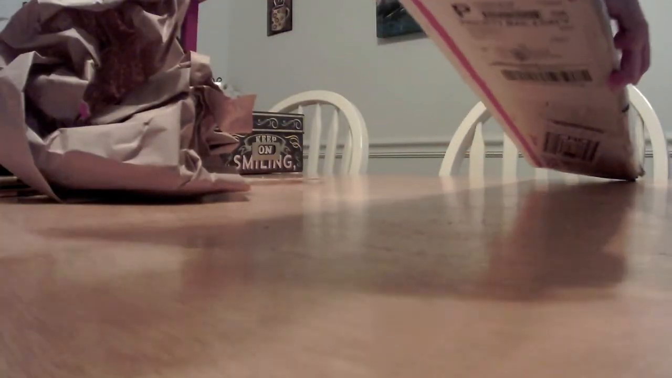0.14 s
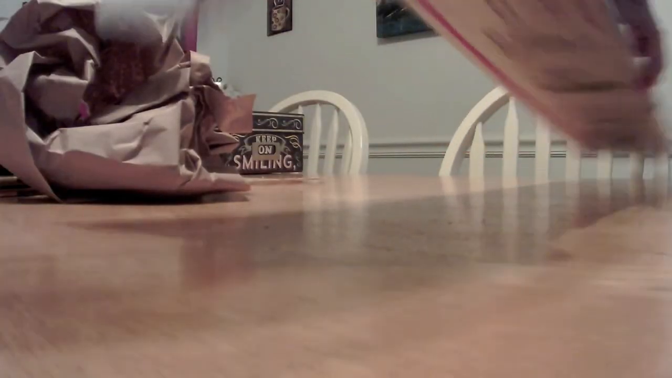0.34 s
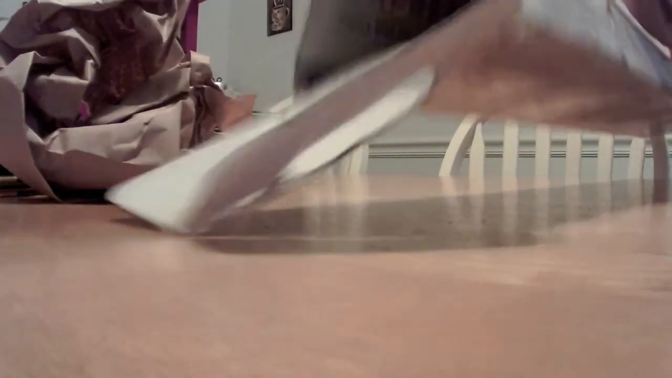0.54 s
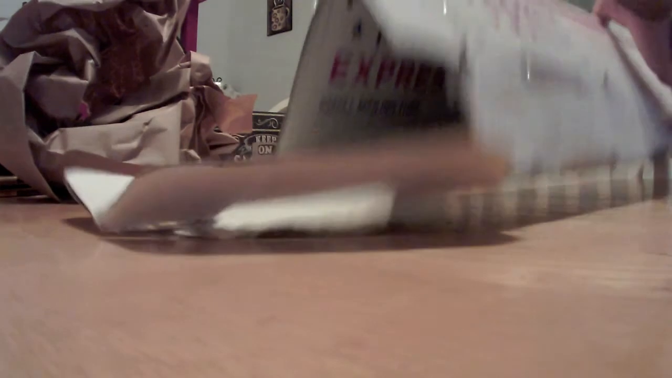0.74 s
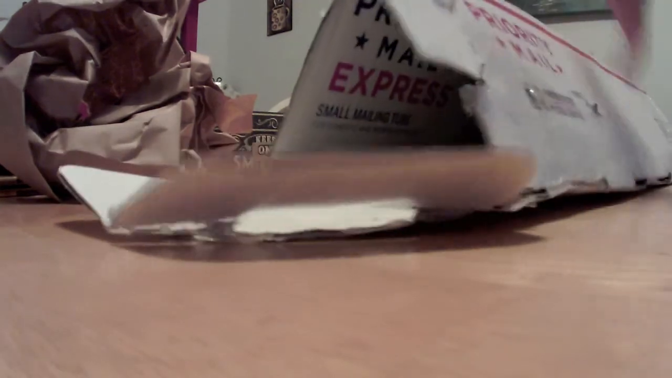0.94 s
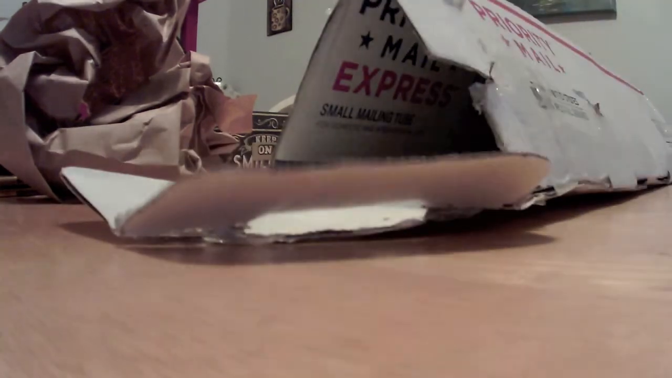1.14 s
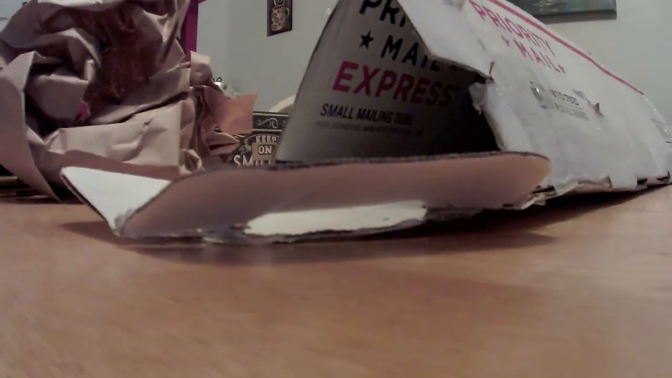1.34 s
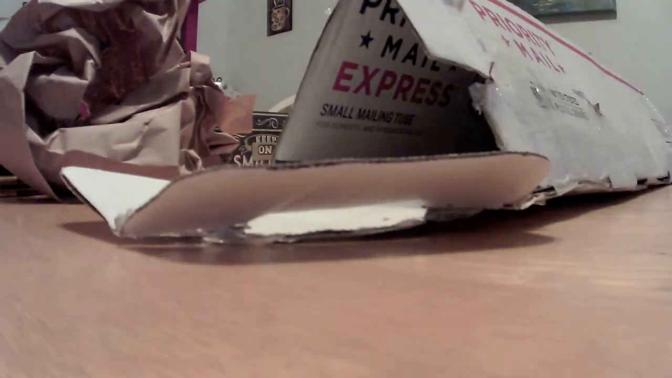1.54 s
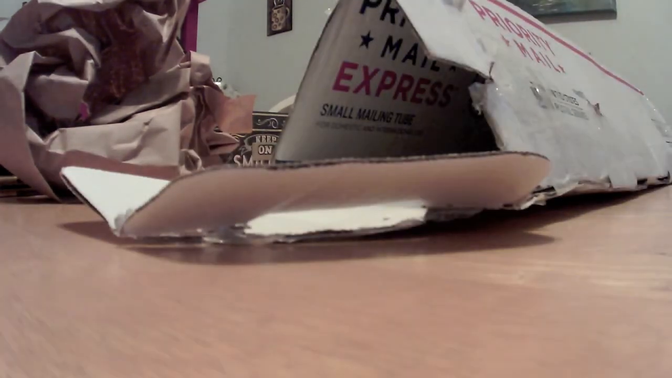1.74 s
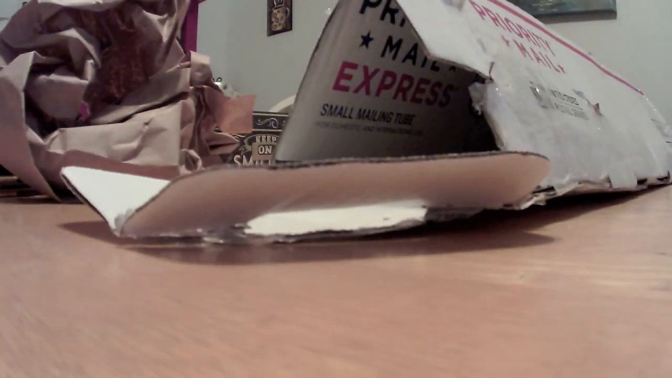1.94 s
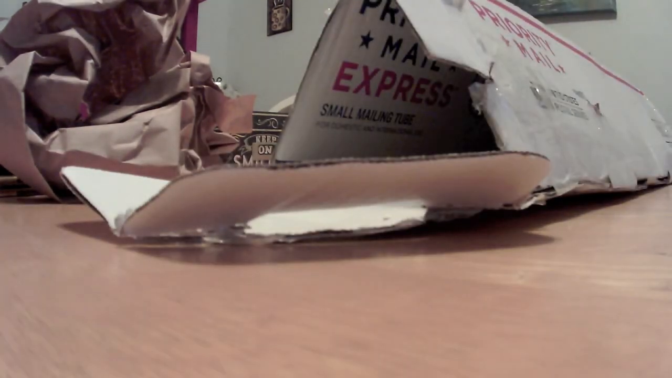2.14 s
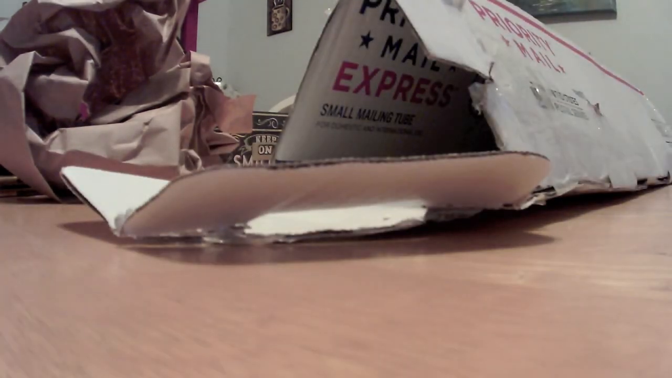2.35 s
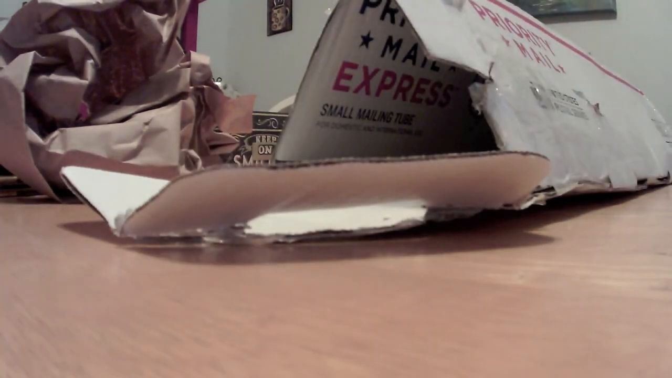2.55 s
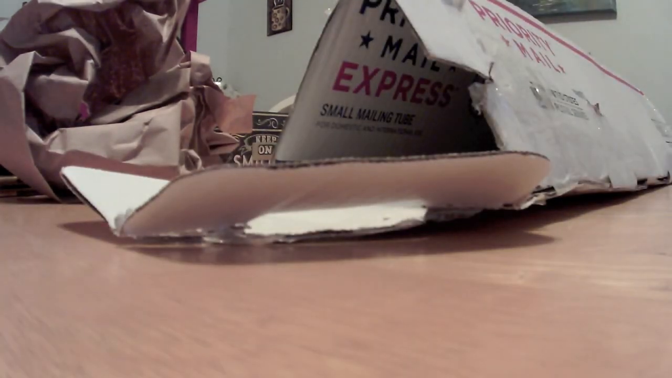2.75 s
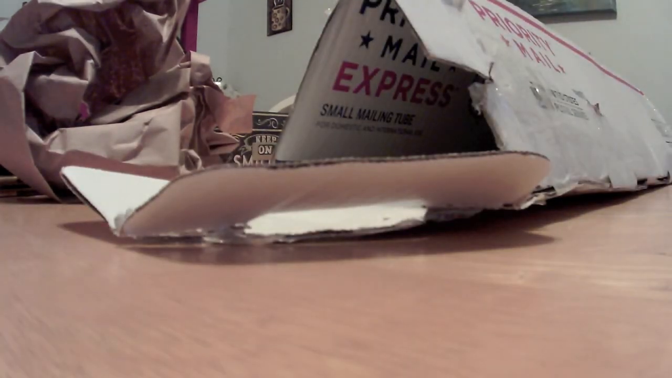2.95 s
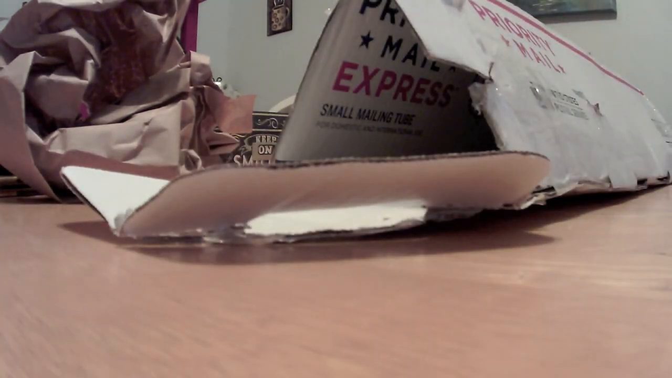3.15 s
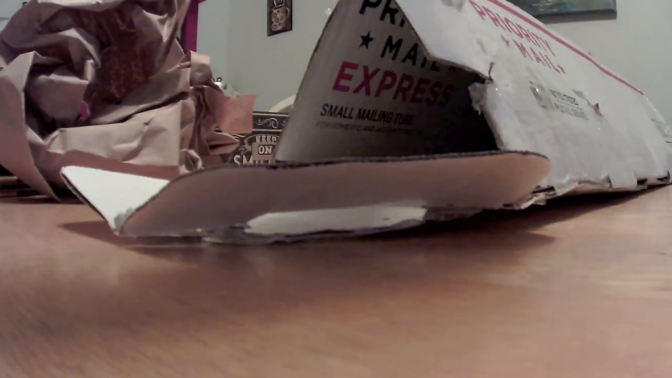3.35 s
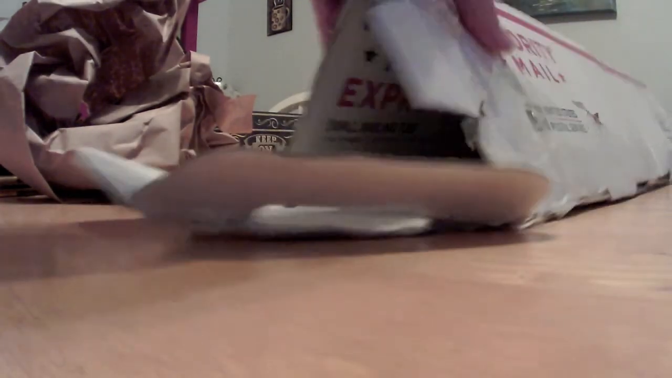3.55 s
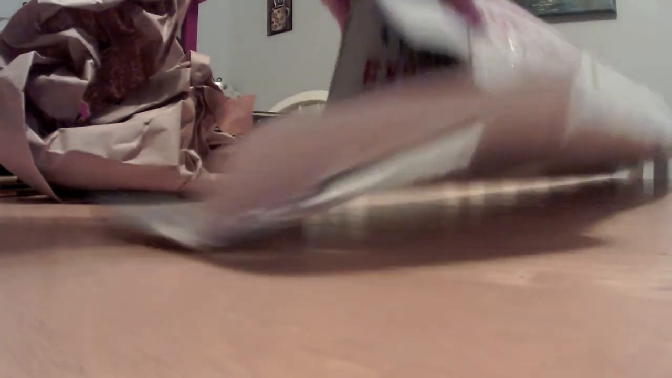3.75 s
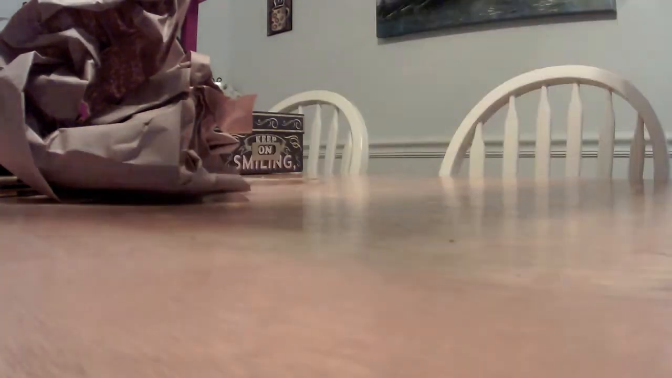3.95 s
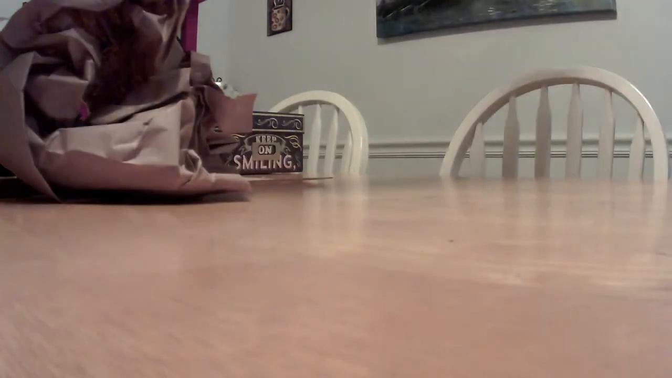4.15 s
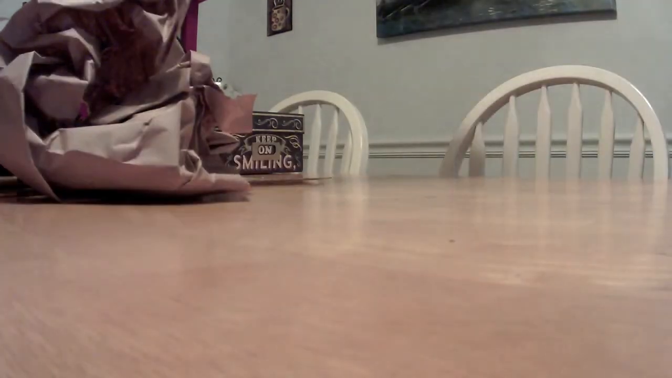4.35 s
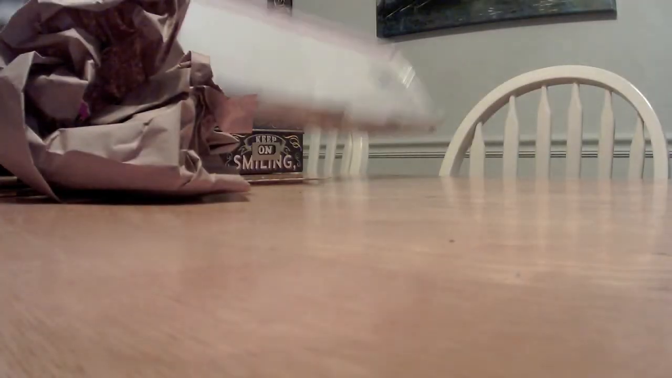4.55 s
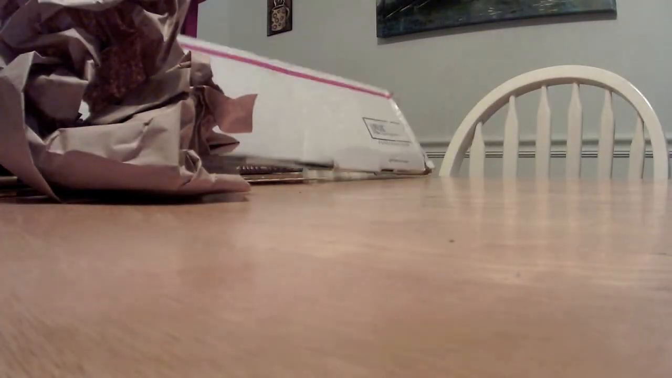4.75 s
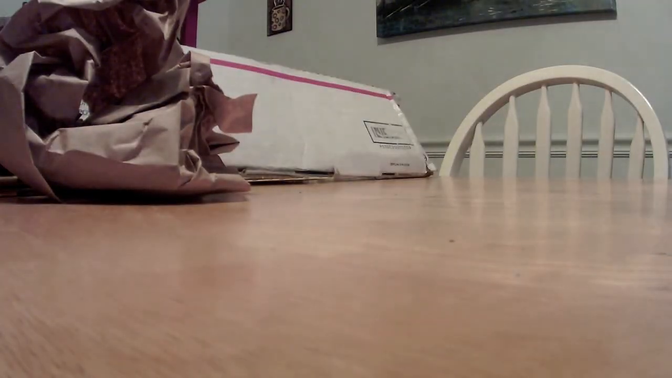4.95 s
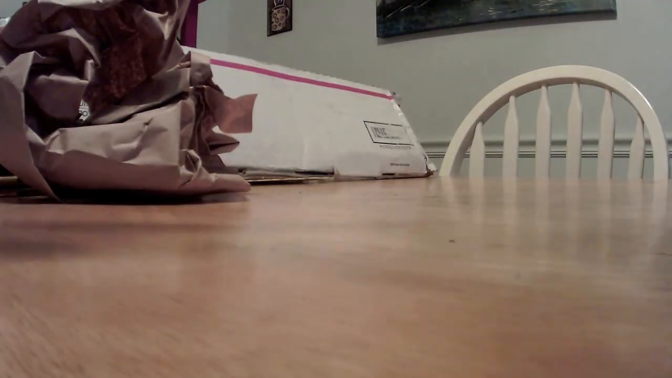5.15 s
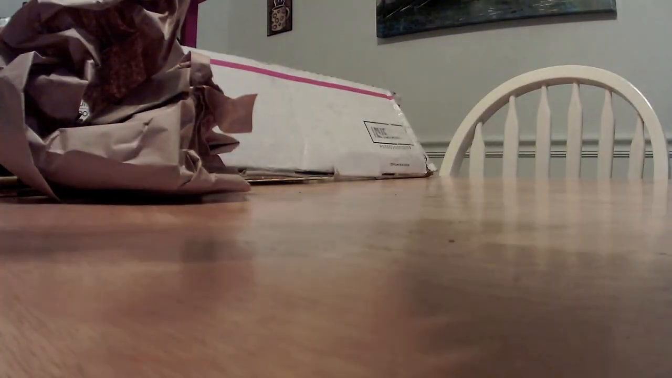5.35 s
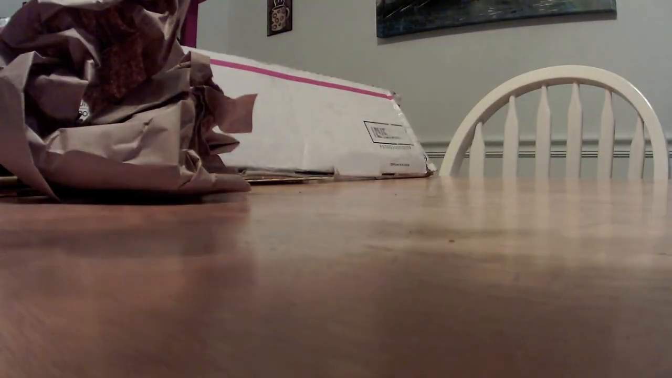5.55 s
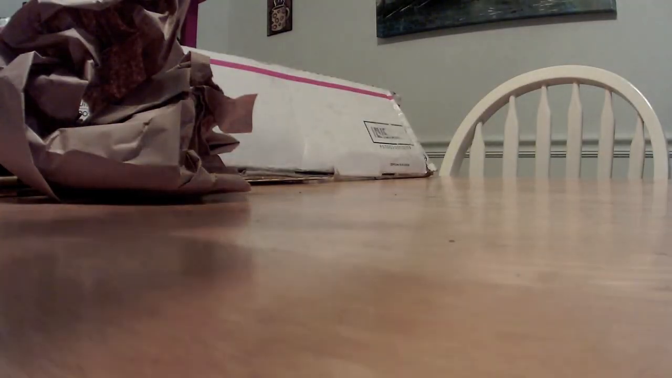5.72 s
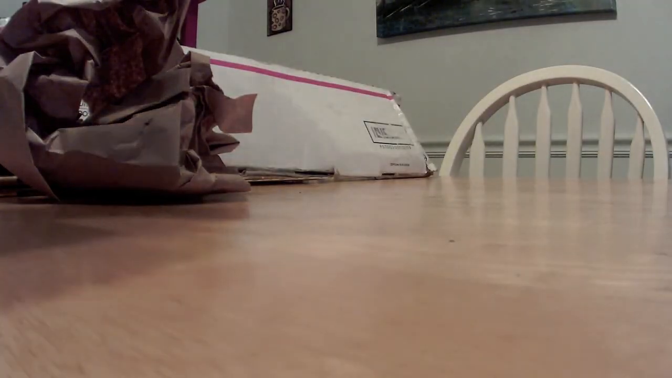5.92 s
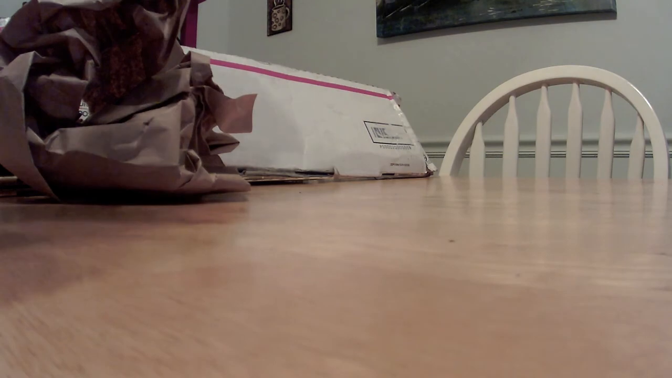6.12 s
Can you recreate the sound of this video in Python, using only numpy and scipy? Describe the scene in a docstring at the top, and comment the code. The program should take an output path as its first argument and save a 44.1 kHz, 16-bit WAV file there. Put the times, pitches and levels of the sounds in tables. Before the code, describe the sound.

A long cardboard box scrapes with a dry, fizzy hiss and lands on a wooden table with a hollow knock and a low thud. Packing paper then rustles and crackles. The box is lifted with more scrapes and bumps and set down again, and a last burst of crinkling follows. The room is small, and the microphone stands on the table, so each bump comes through as a low boom.

```python
"""A long cardboard mailing box is scraped, laid on a wooden table, lifted and set down further off.
Sliding, it fizzes with tiny slips; its edges flick, and knocks on its wall ring the hollow inside.
Between the moves, packing paper rustles as it buckles, and its creases snap. The room is small.
The microphone stands on the table, so every bump reaches it as a low boom."""
import sys
import numpy as np
from scipy import signal
from scipy.fft import rfft, irfft
from scipy.io import wavfile
from scipy.ndimage import uniform_filter1d

SR = 44100
rng = np.random.default_rng(int(sys.argv[2]) if len(sys.argv) > 2 else 0)


def wav_out(sig):
    """Save sig, one row per channel (or a flat mono array), as 16-bit PCM at SR to the path in sys.argv[1]."""
    wavfile.write(sys.argv[1], SR, np.round(np.clip(np.atleast_2d(sig).T, -1, 1) * 32767).astype(np.int16))


N = 276948
T = np.arange(N) / SR
BIN_HZ = np.fft.rfftfreq(N, 1 / SR)

# spectrum of cracking cardboard: (frequency [Hz], level [dB])
CARD_CRACK_SPECTRUM = [(100, -11), (500, -16.5), (1000, -2.5), (1600, 6), (4000, -4.5), (7000, 2.5),
                       (9500, 1.5)]
# paper squeezes: (start [s], swell [s], hold [s], fade [s per 20 dB], level [dB], treble offset [dB])
SQUEEZES = [(1.43, 0.08694, 0.08056, 0.0008, -45, 0), (1.58, 0.24759, .025, 0.166, -40.5, 3),
            (1.955, 0.03349, 0.01683, 0.0972, -45, -1), (2.1, 0.02444, 0.30913, 0.1082, -62.5, -5),
            (2.452, 0.028325, 0.02673, 0.0579, -38, -3.5), (2.54, 0.02431, 0.014385, 0.1109, -37, 0.5),
            (2.68, 0.02619, 0.0071, 0.0779, -42, -1), (2.875, 0.00856, 0.01616, 0.1124, -58, -7),
            (3.025, 0.006638, 0.0543, 0.2207, -60.5, -5.5), (5.395, 0.03952, 0.0564, 0.1652, -42, -0.5),
            (5.53, 0.07427, 0.10013, 0.0594, -36.5, 2), (5.835, 0.01639, 0.0625, 0.0479, -53.5, -3)]


def amp(db):
    """Decibels to gain."""
    return 10 ** (np.asarray(db) / 20)


def unit_rms(x):
    """Scales to rms 1."""
    return x / np.sqrt(np.mean(x ** 2) + 1e-20)


def log_interp(points, hz):
    """Reads a table on a log-frequency axis."""
    point_hz, value = np.transpose(points)
    return np.interp(np.log(hz + 1), np.log(point_hz + 1), value)


def add(mix, start_s, sound):
    """Mixes a sound in at start_s."""
    part = mix[max(round(start_s * SR), 0):][:len(sound)]
    part += sound[:len(part)]


def coloured(x, spectrum, centre_hz=1000, skirt_db_oct=0):
    """Minimum-phase filter: a spectrum times skirts that fall away from a centre."""
    hz = np.fft.rfftfreq(2048, 1 / SR)
    db = log_interp(spectrum, hz) - skirt_db_oct * np.hypot(np.log2((hz + 20) / centre_hz), 1 / 4)
    log_gain = np.log(amp(np.r_[db, db[-2:0:-1]]))
    taps = np.fft.ifft(np.exp(np.conj(signal.hilbert(log_gain)))).real
    return signal.oaconvolve(x, taps)[:len(x)]


def split(x, hz):
    """The bands below and above hz, each at rms 1."""
    low = irfft(rfft(x) / (1 + (BIN_HZ / hz) ** 6), N)
    return unit_rms(low), unit_rms(x - low)


def strokes(rows):
    """Swell, hold and fade of each stroke: gains of the main band and the offset band."""
    main, offset = np.zeros((2, N))
    for start_s, swell_s, hold_s, fade_s, db, offset_db in rows:
        rise = np.clip((T - start_s) / swell_s, 0, 1) ** 0.982
        gain = rise * amp(db - 20 * np.maximum(T - start_s - swell_s - hold_s, 0) / fade_s)
        main, offset = np.hypot(main, gain), np.hypot(offset, gain * amp(offset_db))
    return main, offset


def grains(per_s, spread_db, cycles, hiss, clump_db, facets=24):
    """Tiny slips of uneven size, each briefly ringing one facet, over the hiss of rubbing fibres."""
    t, out = np.arange(256) / SR, np.zeros(N)
    clumps = amp(clump_db * unit_rms(uniform_filter1d(rng.standard_normal(N), size=220)))
    for hz in np.linspace(900, 9600, facets):
        sizes = amp(spread_db * np.minimum(rng.exponential(1, N), 4)) * rng.choice([-1, 1], N)
        slips = sizes * (rng.random(N) < per_s / facets / SR)
        facet = np.exp(-t * np.sqrt(hz * 4000) / cycles) * np.sin(2 * np.pi * hz * t)
        out += np.convolve(slips, unit_rms(facet))[:N]
    out = clumps * (unit_rms(out) + hiss * rng.standard_normal(N))
    return out / np.sqrt(uniform_filter1d(out ** 2, size=2200) + 1e-9)  # levelled over 50 ms


def flexed(x, depth_db):
    """A bending sheet changes shape, so its broad resonances come and go."""
    spectra = signal.stft(x, nperseg=256)[2]
    patches = uniform_filter1d(rng.standard_normal(spectra.shape), size=4, axis=0)
    patches = uniform_filter1d(patches, size=20, axis=1)
    return signal.istft(spectra * amp(depth_db * unit_rms(patches)), nperseg=256)[1][:N]


def burst(t60_s, rise_s=0.0014, size=4096):
    """A shower of fibre breaks that swells in an instant and dies fast."""
    t = np.arange(size) / SR
    return rng.choice([-1, 1], size) * (1 - np.exp(-t / rise_s)) * amp(-60 * t / max(t60_s, .001))


def at_level(sound, db):
    """Gives a short sound the energy of 4 ms at this level."""
    return amp(db) * sound / np.linalg.norm(sound) * np.sqrt(SR / 250)


def cracks(rows, spectrum):
    """A crease or edge lets go: one burst, coloured by the size of the facet that moves."""
    out = np.zeros(N)
    for start_s, db, centre_hz, t60_s in rows:
        crack = coloured(burst(t60_s), spectrum, centre_hz, skirt_db_oct=7)
        add(out, start_s, at_level(crack, db))
    return out


def scraping():
    """Cardboard slides: a fizz at the edge, the hollow body below it, a rumble through the table."""
    # box slides: (start [s], swell [s], hold [s], fade [s per 20 dB], level [dB], body offset [dB])
    slides = [(-.03, 0.08848, 0.01925, 0.0991, -34.5, -5), (.09, 0.03481, 0.1113, 0.1739, -36.5, -9.5),
              (.29, 0.0459, 0.19533, 0.0499, -36.5, -8.5), (.4, 0.055435, 0.038973, 0.0385, -26, -9.5),
              (.55, 0.01311, 0.00448, 0.0283, -41.5, 1.5), (.58, .01, 0.0729, 0.5994, -56, -4),
              (.67, 0.00704, 0.0062, 0.0721, -47, -8), (.775, 0.05013, 0.07565, 0.1958, -51, 1),
              (.902, 0.014993, 0.04907, 0.0527, -40.5, 0), (.942, 0.00559, 0.010544, 0.0054, -30, -0.5),
              (1.025, 0.01413, 0.004695, 0.2218, -50.5, -1), (3.645, 0.03072, 0.004, 0.1048, -42, 2),
              (3.705, 0.02173, 0.00352, 0.0807, -35.5, -5), (3.75, 0.0277, 0.1491, 0.1435, -50.5, -1.5),
              (3.853, 0.0062, 0.004854, 0.0749, -43.5, 4), (3.928, 0.007195, 0.005036, 0.0519, -45, 5.5),
              (4.737, 0.014034, 0.01072, 0.0682, -43, 0), (4.812, 0.04264, 0.01388, 0.1031, -42.5, -0.5),
              (4.91, 0.01218, 0.0628, 0.1811, -50.5, -.5)]
    # spectrum of rubbed cardboard: (frequency [Hz], level [dB])
    card_spectrum = [(150, -48.5), (250, -16.5), (545, -15), (973, -5), (1190, -5.5), (1420, 0), (3100, -3),
                     (3450, -5), (6660, -1), (7290, -4.5), (7870, -11.5), (8500, 2), (9600, -1),
                     (12500, -44), (21100, -120)]
    slips = grains(per_s=3200, spread_db=3.7, cycles=1.2, hiss=.7, clump_db=1.5)
    body, fizz = split(coloured(flexed(slips, depth_db=2), card_spectrum), hz=2131.5)
    rumble = split(rng.standard_normal(N), hz=220.2)[0]
    fizz_gain, body_gain = strokes(slides)
    return amp(-0.8012) * (fizz * fizz_gain + body * body_gain) + amp(-17.5) * rumble * body_gain


def room_noise(noise_db=-56.5, flutter_db=1.4651, hum_hz=61.8, hum_db=-67):
    """Slightly fluttering background noise with a faint, wavering hum."""
    # background spectrum: (frequency [Hz], level [dB])
    air_spectrum = [(20, -5), (45, 1.5), (70, -1), (100, -7), (200, -10.5), (400, -14.5), (800, -18.5),
                    (1600, -18.5), (4000, -22.5), (9500, -23.5)]
    noise, flutter, waver = (unit_rms(irfft(rfft(rng.standard_normal(N)) * gain, N)) for gain in
                             (amp(log_interp(air_spectrum, BIN_HZ)), *[np.exp(-BIN_HZ / 5)] * 2))
    hum = np.sin(2 * np.pi * hum_hz * T + .5 * waver) * amp(3.4 * flutter)
    return noise * amp(noise_db + flutter_db * flutter) + amp(hum_db) * unit_rms(hum)


def flicking():
    """Edges and flaps of the box catch and let go."""
    # edge flicks: (time [s], level [dB], centre [Hz], t60 [s])
    flicks = [(.2341, -15.5, 6900, 0.007168), (.3169, -30, 3900, 0.01149), (.4414, -28.5, 6200, 0.0065),
              (.4497, -21.5, 7050, 0.01226), (.4687, -22.5, 4000, 0.00788), (.5678, -25, 6873, 0.01483),
              (.5817, -32, 7500, 0.01018), (.6762, -28, 5533, 0.01517), (.8183, -35, 7300, 0.01267),
              (.9183, -31, 5280, 0.01637), (1.0067, -33.5, 4810, 0.00916), (3.5492, -42.5, 3375, 0.007093),
              (3.6553, -36, 2293, 0.00867), (3.6675, -31, 6000, 0.00626), (3.6718, -29.5, 2708, 0.00932),
              (3.8501, -19.5, 6523, 0.002681), (4.1226, -45, 4126, 0.00772), (4.5285, -49.5, 5570, .007),
              (4.5856, -48, 2558, 0.03536), (4.7407, -42.5, 3570, 0.00505), (4.8515, -31, 6140, 0.006885),
              (4.8948, -26.5, 7950, 0.018), (4.9183, -32.5, 4200, 0.01392), (4.9447, -37, 3170, 0.0059),
              (4.9849, -35.5, 5724, 0.02434)]
    return cracks(flicks, CARD_CRACK_SPECTRUM)


def hollow_ring(t):
    """The inside of the box rings roughly: each resonance is a cluster of beating modes."""
    # box resonances: (frequency [Hz], level [dB], t60 [s])
    resonances = [(1000, -7.5, 0.14), (1133.8, -8, 0.33), (1389.2, -7, 0.44), (1501.5, 4, 1),
                  (1472.3, -10, 0.35), (1637.6, -6.5, 1), (1854.4, -3, 0.94), (1781, 1.5, 0.18),
                  (2392, -21, .3), (2988.5, 8.5, 0.3711)]
    beats = uniform_filter1d(rng.standard_normal((len(resonances), len(t))), size=500, axis=1)
    hz, db, t60_s = np.transpose(resonances)[:, :, None]
    return (beats * amp(db - 60 * t / t60_s) * np.sin(2 * np.pi * hz * t)).sum(0)


def knocking(crunch_db=-7.5, rise_s=0.0003178, picked_up_s=3.6):
    """The box wall yields with a damped note and a crunch; the inside rings, less once picked up."""
    # wall knocks: (time [s], level [dB], pitch [Hz], t60 [s])
    knocks = [(.235, -33.5, 817.3, 0.00715), (.9465, -27.5, 1587, .018), (0.9549, -23, 1504, 0.009046),
              (1.018, -40, 1680, 0.0189), (1.108, -45.5, 1708, 0.01056), (1.154, -46, 1636, 0.009),
              (3.063, -48.5, 1361, 0.0426), (3.6719, -33, 1496, 0.00869), (3.727, -36, 1619, 0.01357),
              (3.858, -33.5, 1073, 0.01177), (3.931, -23, 1626, 0.01188), (4.585, -50, 1450, 0.03078),
              (4.747, -38.5, 1874, 0.01238), (4.763, -38, 1821, 0.01348), (4.852, -28.5, 1261, 0.02345),
              (4.866, -43, 516.7, 0.048), (4.919, -37, 1300, 0.014), (5.092, -51, 1603, 0.0085)]
    out, t = np.zeros(N), np.arange(SR // 2) / SR
    contact = 1 - np.exp(-t / rise_s)
    for start_s, db, hz, t60_s in knocks:
        ring_db = -10.5 if start_s < picked_up_s else -26.5
        wall = contact * amp(-60 * t / t60_s) * np.sin(2 * np.pi * hz * t)
        crunch = coloured(burst(2 * t60_s), CARD_CRACK_SPECTRUM, hz, skirt_db_oct=9)
        add(out, start_s, at_level(wall, db))
        add(out, start_s, at_level(crunch, db + crunch_db))
        add(out, start_s, at_level(contact * hollow_ring(t), db + ring_db))
    return out


def bumping(skirt_db_oct=7, cut_db_oct=12, rise_s=0.004096, settle_s=0.010967, settle_hz=47.685):
    """The table top booms: each blow drives its modes, then the weight follows as a soft, low push."""
    # bumps on the table: (time [s], blow [dB], drive centre [Hz], settling weight [dB])
    bumps = [(.55, -46, 149, -37.5), (.916, -36, 230, -51.5), (.952, -26, 399.1, -34),
             (1.028, -45, 200.1, -34.5), (1.136, -46, 190.3, -41), (2.619, -27.5, 175.5, -34.5),
             (3.675, -34.5, 240.2, -39.5), (3.858, -19.5, 321.6, -38.5), (3.906, -46.5, 190, -39.5),
             (4.747, -29.5, 187.3, -44.5), (4.801, -41, 190, -39), (4.861, -32.5, 189, -42),
             (4.943, -36.5, 188.7, -31.5), (5.02, -45, 190, -38)]
    # table-top modes: (frequency [Hz], level [dB], t60 [s])
    table_modes = [(42.564, -5.5, 0.6), (60.818, 6, 0.5583), (122.78, -6.5, 0.338), (189.71, 4.5, 0.1181),
                   (220.42, -6, 0.1733), (304.19, -1, 0.06741), (406.87, -14.5, 0.1545),
                   (503.06, -23, 0.14)]
    out, t = np.zeros(N), np.arange(SR) / SR
    hz, mode_db, t60_s = np.transpose(table_modes)[:, :, None]
    modes = amp(-60 * t / t60_s) * np.sin(2 * np.pi * hz * t) * (1 - np.exp(-t / rise_s))
    blows = [(s, db, drive_hz) for s, db, drive_hz, _ in bumps]
    settles = [(s + settle_s, weight_db, settle_hz) for s, _, _, weight_db in bumps]
    for start_s, db, drive_hz in blows + settles:
        octaves = np.log2(hz / drive_hz)
        # modes quicker than the contact are hardly driven
        drive = amp(mode_db - skirt_db_oct * abs(octaves) - cut_db_oct * np.maximum(octaves, 0))
        add(out, start_s, amp(db) * (drive * modes).sum(0) / np.linalg.norm(drive))
    return out


def crinkles(tries, firm_db=-42, slack_db=-62):
    """Small creases give way at random, louder under a harder squeeze; returns snap rows."""
    time_s = rng.random(tries) * T[-1]
    size, facet = np.clip(rng.standard_normal((tries, 2)), -2, 2).T
    squeeze_db = 20 * np.log10(np.interp(time_s, T, strokes(SQUEEZES)[0]) + 1e-9)
    level_db = -40 + 0.4632 * (squeeze_db - firm_db) + 2 * size
    centre_hz = 5394 * 2 ** (0.36 * facet)
    return list(np.c_[time_s, level_db, centre_hz][squeeze_db > slack_db])


def snapping(t60_s=0.004591):
    """Paper creases snap, large and small, all dying equally fast."""
    # large creases: (time [s], level [dB], centre [Hz])
    snaps = [(1.3595, -47, 2950), (1.4695, -42.5, 3780), (1.4939, -35, 4400), (1.5048, -31, 3670),
             (1.543, -30.5, 6250), (1.568, -26.5, 6940), (1.5899, -31, 6740), (1.641, -38.5, 6440),
             (1.6873, -35.5, 7600), (1.8364, -33.5, 5570), (1.9542, -36, 5900), (2.1382, -38, 6300),
             (2.1807, -33, 6960), (2.2205, -38, 6160), (2.2454, -40, 3150), (2.3663, -44, 2970),
             (2.403, -41.5, 3450), (2.4619, -40, 3440), (2.547, -38.5, 7440), (2.5628, -28.5, 5430),
             (2.5691, -32.5, 4300), (2.691, -29.5, 7200), (2.79, -45, 3070), (2.8812, -40, 4600),
             (3.061, -39.5, 5200), (5.306, -49, 3227), (5.4747, -28, 4250), (5.551, -27.5, 3880),
             (5.602, -23, 7200), (5.7669, -32.5, 8000), (5.7921, -30, 4309), (5.8388, -40.5, 6200),
             (6.1955, -32, 6308)]
    # spectrum of a snapping crease: (frequency [Hz], level [dB])
    crease_spectrum = [(100, -40), (600, -7.5), (1400, -1.5), (2800, 4), (4500, -2), (7000, -0.5),
                       (9500, 0.5)]
    rows = [(s, db, hz, t60_s) for s, db, hz in snaps + crinkles(tries=160)]
    return cracks(rows, crease_spectrum)


def rustling():
    """Paper crumples in clumps of small buckles."""
    # spectrum of crumpling paper: (frequency [Hz], level [dB])
    paper_spectrum = [(210, -67), (350, -25.5), (380, -25), (530, -24), (1580, -2), (2610, 1.5), (4240, -3),
                      (5590, 6), (7080, 4), (7480, -14.5), (7910, -9.5), (8590, 8), (9600, 4.5),
                      (12500, -30), (21100, -120)]
    buckles = grains(per_s=2000, spread_db=4, cycles=1.5, hiss=.4, clump_db=1.6)
    sheet, crisp = split(coloured(flexed(buckles, depth_db=2), paper_spectrum), hz=4073.4)
    sheet_gain, crisp_gain = strokes(SQUEEZES)
    return amp(-0.3011) * sheet * sheet_gain + amp(-2.0011) * crisp * crisp_gain


def room(x, early_db, tail_db, early_t60_s):
    """Adds close reflections off table and box, and the tail of the walls, dying faster in the treble."""
    # wall reverberation: (frequency [Hz], t60 [s])
    decay_times = [(100, 0.78), (500, 0.7713), (1600, 0.35734), (4000, 0.3338), (10000, 0.27466)]
    t = np.arange(SR) / SR
    taps = rng.choice([-1., 1.], SR) * (rng.random(SR) < 1 / 12) * (t > .003)
    hz, frame_s, spectra = signal.stft(taps, SR, nperseg=256)
    decay = amp(-60 * frame_s / log_interp(decay_times, hz)[:, None])
    tail = signal.istft(spectra * decay, SR, nperseg=256)[1][:SR]
    early = taps * rng.standard_normal(SR) * amp(-60 * t / early_t60_s)
    echo = amp(tail_db) * tail / np.linalg.norm(tail) + amp(early_db) * early / np.linalg.norm(early)
    return x + signal.fftconvolve(x, echo)[:N]


def scene():
    """The box is near; the paper is further off, though its snaps stand clear of the room."""
    box = room(scraping() + flicking() + knocking(), early_db=-14, tail_db=-12.5, early_t60_s=0.07614)
    paper = room(rustling(), early_db=-9.5, tail_db=-6, early_t60_s=0.23)
    snaps = room(snapping(), early_db=-23, tail_db=-10, early_t60_s=0.051)
    return (box + paper + snaps + bumping() + room_noise())[None]


def record(dry):
    """The microphone has a narrow treble notch and a steep band limit."""
    notch_hz, cutoff_hz = 7930, 9740
    notch_db = -30 * np.exp(-((BIN_HZ - notch_hz) / 290) ** 2)
    notched = irfft(rfft(dry) * amp(notch_db), N)
    lowpass = signal.firwin(301, cutoff_hz, window=("kaiser", 7), fs=SR)
    return signal.oaconvolve(notched, lowpass[None], "same")


dry = scene()
out = record(dry)
wav_out(out)
```